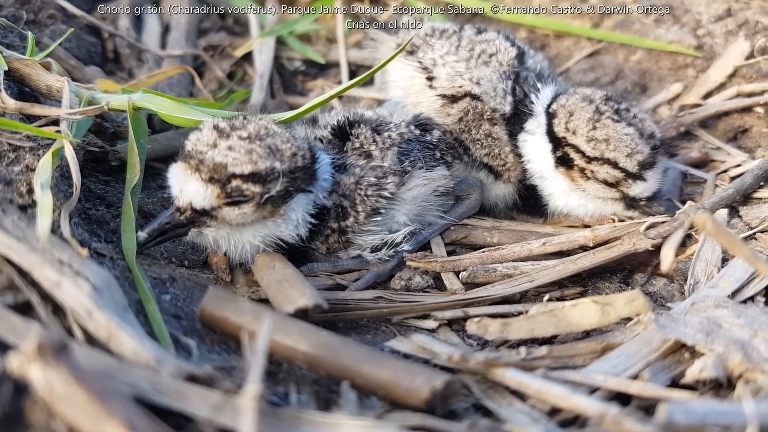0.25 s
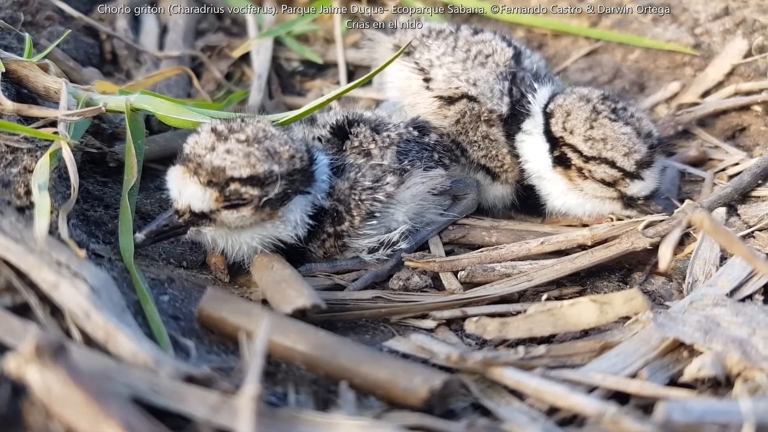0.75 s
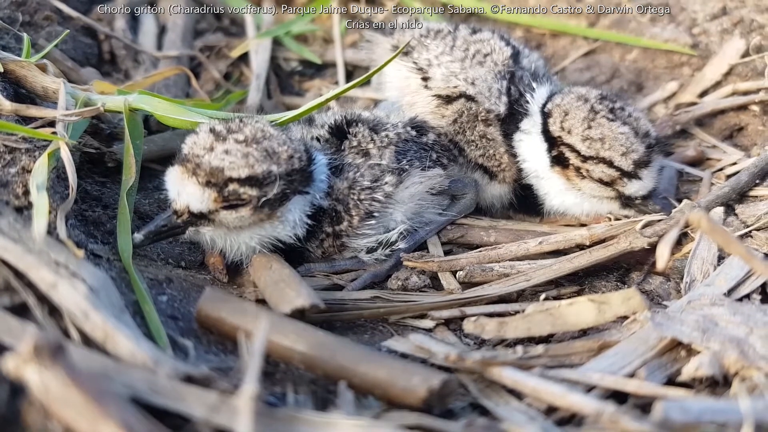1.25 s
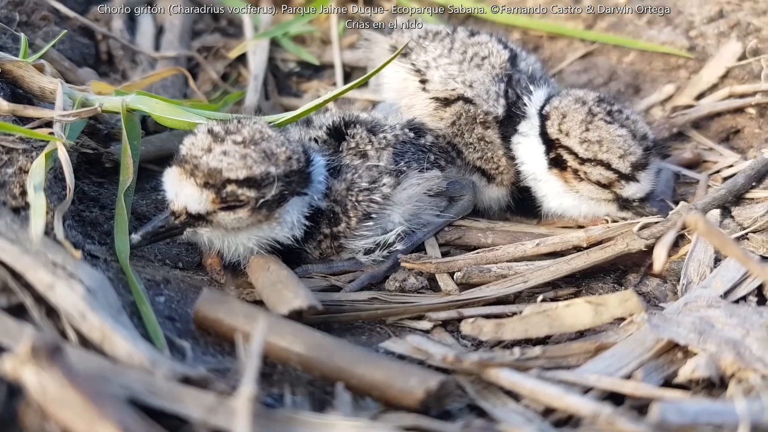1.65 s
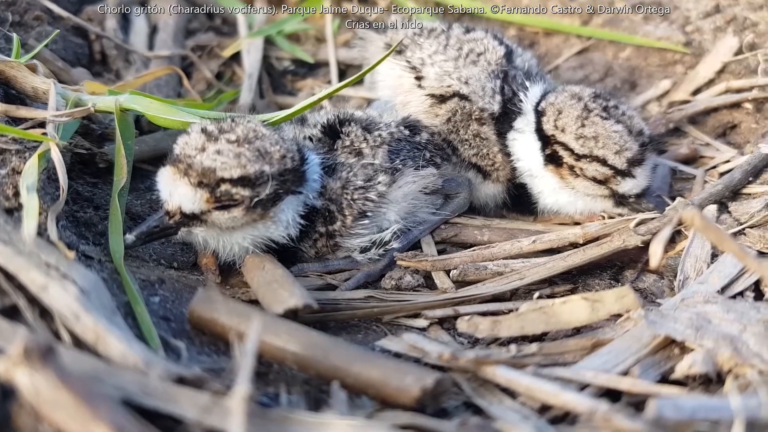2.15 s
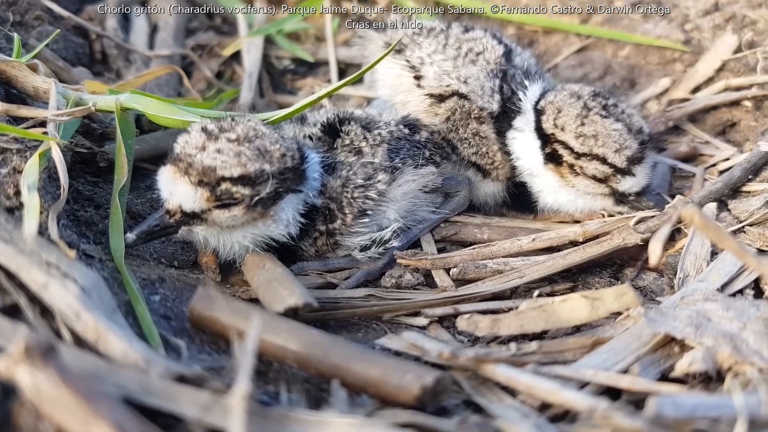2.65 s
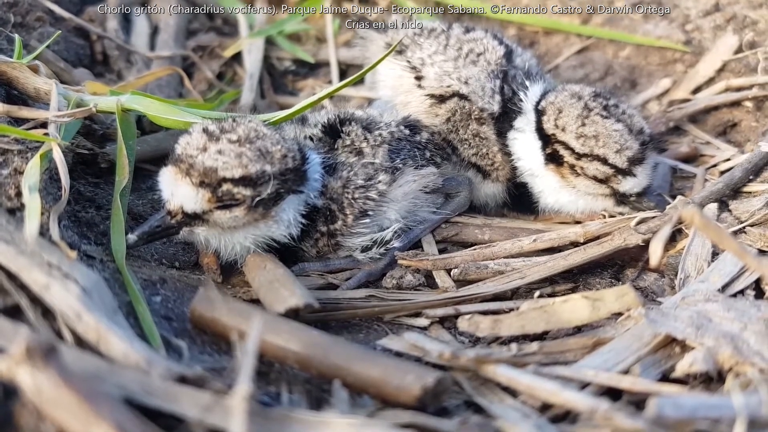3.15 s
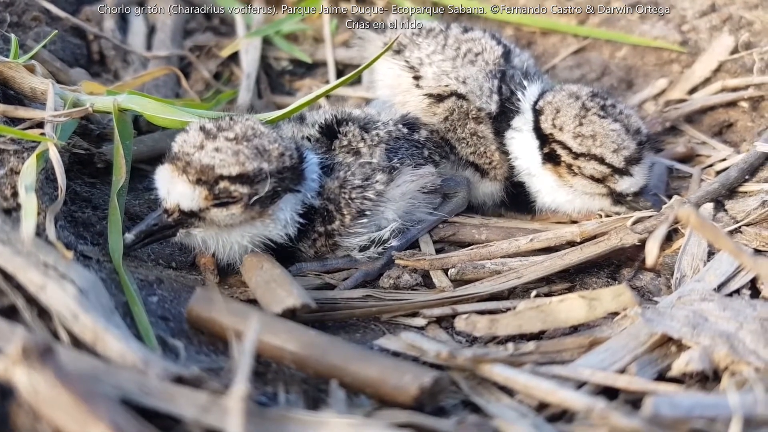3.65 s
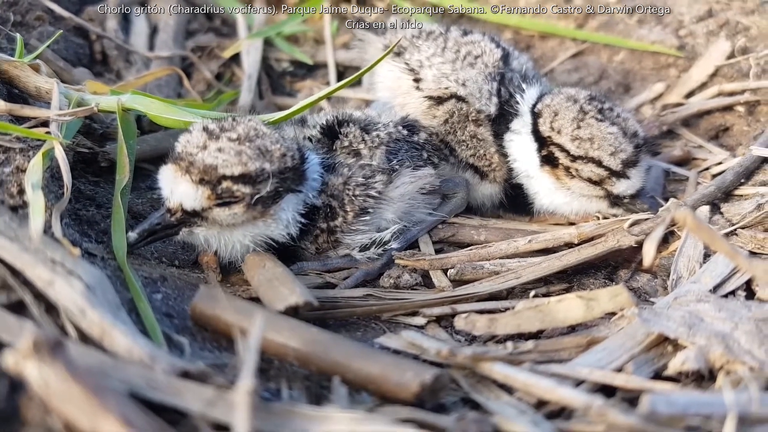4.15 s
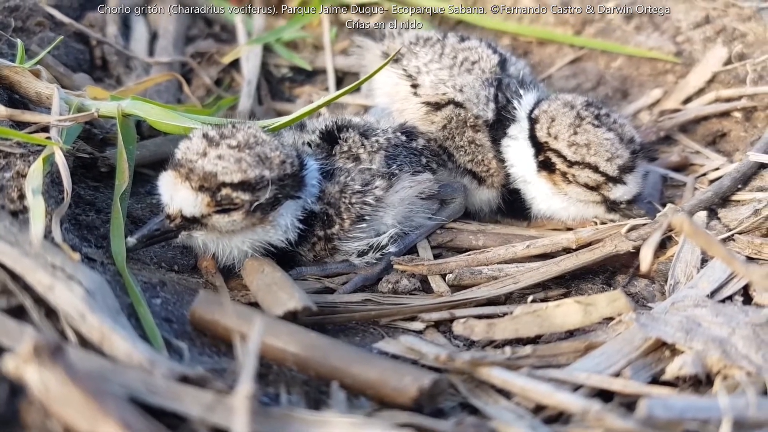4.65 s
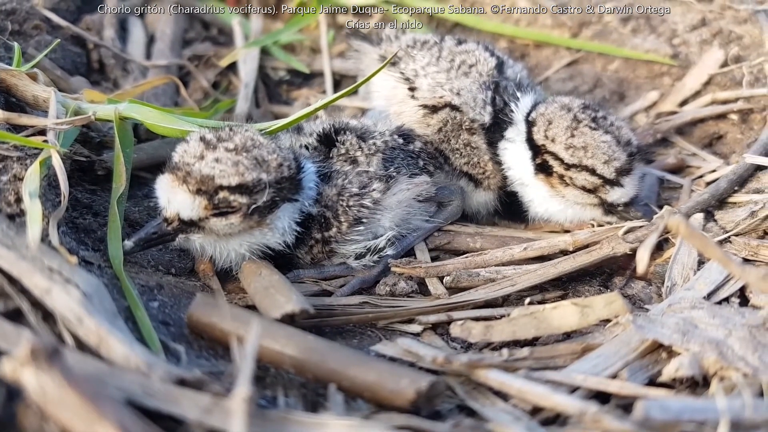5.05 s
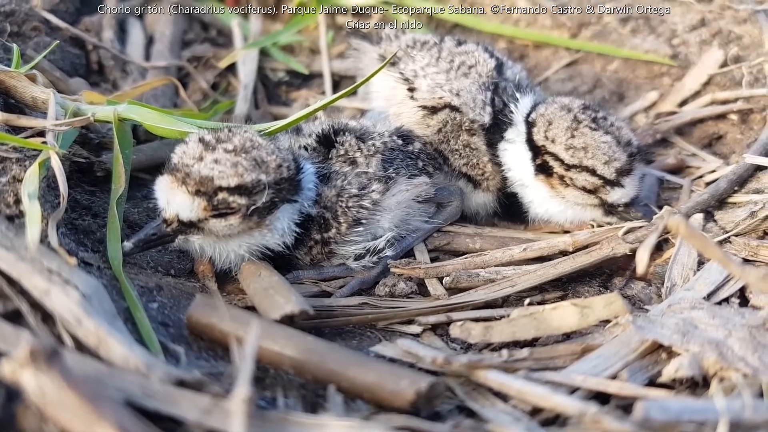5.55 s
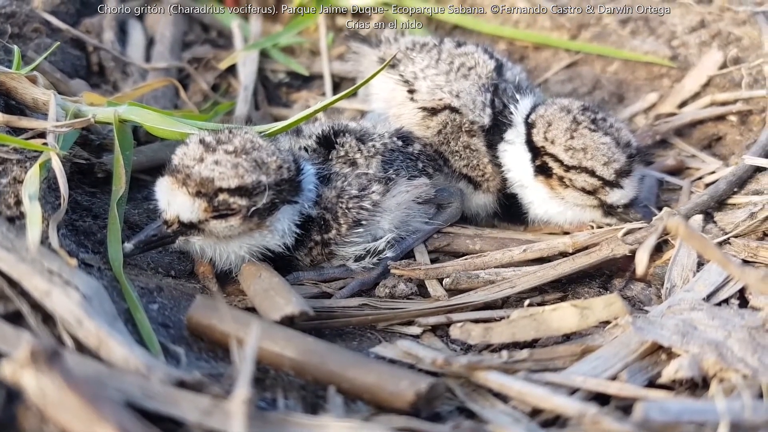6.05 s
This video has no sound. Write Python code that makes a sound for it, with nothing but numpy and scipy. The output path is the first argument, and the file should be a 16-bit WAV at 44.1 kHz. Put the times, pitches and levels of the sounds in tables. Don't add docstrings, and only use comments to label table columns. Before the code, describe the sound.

Right at the start a close plover chick gives a high, fluttering squeal breaking into rapid dry ticks, then a quick falling chirp. Low wind rumble and soft hiss continue while distant birds whistle faintly. Past the middle, a rising chip leads into a loud, clear, piercing peep with a stem rustle. Faint nasal yips repeat to the end with thin rising whistles. Open ground, stereo microphone near the chick, who sits left.

```python
import sys
import numpy as np
from scipy import signal
from scipy.fft import rfft, irfft
from scipy.io import wavfile
from scipy.ndimage import uniform_filter1d

SR = 44100
rng = np.random.default_rng(int(sys.argv[2]) if len(sys.argv) > 2 else 0)


def volts(x):
    e = np.asarray(x, float) / 20
    return 10 ** e


def dump(signal):
    limited = np.clip(np.atleast_2d(signal).T, -1, 1)
    pcm = np.round(limited * 32767).astype(np.int16)
    wavfile.write(sys.argv[1], SR, pcm)


N = 278271

# time_s, pitch_hz, level_db, flutter_depth (0-1)
SQUEAL = [(.02, 4590, -36, .4), (.027, 4560, -22.5, .3), (.05, 4470, -23, .22), (.058, 4400, -30, .6),
          (.09, 4170, -44, .4), (.155, 4080, -51, .4), (.161, 4090, -37, .12), (.208, 4200, -37.5, .15),
          (.218, 4220, -47, .3)]
# time_s, pitch_hz, level_db, flutter_depth (0-1)
FALLING_NOTE = [(.28, 4540, -50, .2), (.286, 4490, -33, .06), (.292, 4420, -33, .05),
                (.297, 4330, -46, .05), (.303, 4100, -33, .05), (.313, 3830, -29, .04),
                (.322, 3580, -31.5, .03), (.329, 3400, -43, .03)]
# time_s, pitch_hz, level_db, flutter_depth (0-1)
CHIP = [(3.655, 3072, -42, .04), (3.665, 3749, -29.5, .03), (3.671, 3990, -31, .03), (3.676, 4190, -40, .1)]
# time_s, pitch_hz, level_db, flutter_depth (0-1)
PEEP = [(3.678, 4150, -37, .1), (3.697, 4560, -24, .012), (3.72, 4735, -22, .02), (3.749, 4675, -20, .04),
        (3.762, 4545, -21, .012), (3.792, 4525, -25, .02), (3.845, 4650, -22, .008),
        (3.895, 4660, -27, .006), (3.965, 4905, -32.5, .006)]
# release_s, fade_db, pitch_change_hz
RELEASES = [
    (.007, -18, -150),
    (.026, -26, 30),
]
# first_s, last_s, rise_hz
REGISTER_JUMP = (3.792, 3.819, 125)
# time_s, added_flutter (0-1)
CATCHES = [(3.731, .15), (3.806, .05), (3.848, .012)]
# multiple, level_db
PEEP_OVERTONES = [(2, -25.5)]
# frequency_hz, gain_db
BEAK = [(1500, -20), (2600, -9), (3400, 0), (5800, 0), (7000, -3), (12000, -3)]
# time_s, peak_db
SNAPS = [(.0039, -25), (.0124, -24), (.0172, -22), (.0235, -24), (.0595, -25), (.064, -25), (.0681, -24),
         (.0705, -27), (.0729, -25), (.0757, -26), (.0799, -27), (.0835, -28), (.0877, -24.5), (.0935, -26),
         (.0999, -29), (.1038, -28), (.1111, -28), (.1226, -26), (.1407, -28.5), (.1485, -25.5),
         (.1624, -27), (.1761, -27), (.1913, -28), (.1964, -28), (.213, -25), (.2252, -27), (.2328, -26),
         (.2352, -26), (.2592, -26), (.2643, -26)]
# time_s, pitch_hz
SNAP_PITCH = [(0, 4680), (.07, 4600), (.11, 4250), (.2, 4170), (.21, 4600), (.27, 4600)]
# first_s, last_s, level_db, spread_db, rate_per_s
FAINT_SNAPS = (.088, .28, -39, 3, 180)

# start_s, length_s, top_pitch_hz, level_db, sag_lateness (exponent)
YIPS = [(3.28, .078, 805, -56, 1.6), (4.07, .095, 845, -47, 1.0), (4.551, .085, 840, -43.5, 1.1),
        (4.905, .1, 900, -40, 1.2), (5.228, .1, 928, -38.5, 1.6), (5.533, .03, 900, -44, 1.2),
        (5.56, .072, 900, -43.5, 1.6), (5.823, .1, 930, -39.5, 2.2), (6.1, .1, 930, -39.5, 2.6)]
# frequency_hz, gain_db
YIP_THROAT = [(900, -45), (1500, -16), (1850, -3), (2500, 9), (3700, 6.5), (4600, -3.5), (5500, -4.5),
              (7000, -16.5), (8300, -25), (10200, -32.5), (12000, -53)]
# frequency_hz, gain_db
BREATH = [(1500, -48), (3000, -36.5), (5500, 2), (7000, -13.5), (8500, -3), (11500, -12.5), (16000, -26.5)]

# start_s, pitch_hz, level_db
PIPS = [
    (1.878, 1990, -55),
    (4.428, 2010, -54),
]
# start_s, length_s, top_hz, bend (exponent), end_level_db
RISES = [
    (1.972, .36, 1985, 1.0, -53),
    (4.485, .455, 1960, 1.8, -50),
    (5.575, .182, 1918, 3.5, -45.5),
]
# start_s, length_s, first_hz, last_hz, level_db
FLICKS = [
    (5.522, .032, 2030, 2080, -51),
    (5.757, .03, 1975, 1995, -50),
]
# multiple, level_db
BRIGHT_PARTIALS = [(1, -6), (2, 0), (3, -24), (4, -25), (5, -16), (6, -24)]
# multiple, level_db
WHISTLE_PARTIALS = [(1, -10), (2, 0), (3, -29), (4, -34), (5, -36)]
# start_s, length_s, first_hz, last_hz, level_db
SLIDES = [(2.15, .05, 4150, 4120, -66), (2.197, .05, 4130, 3200, -56), (2.245, .05, 3250, 2750, -64),
          (2.76, .49, 4530, 2300, -59.5), (1.275, .03, 3250, 3100, -67), (5.352, .075, 4150, 3500, -66),
          (5.44, .055, 3350, 3050, -65), (3.433, .02, 3200, 3150, -63), (3.527, .022, 3200, 3150, -60),
          (3.62, .02, 3200, 3050, -62), (3.72, .02, 3100, 3270, -39.5), (3.74, .022, 3150, 3050, -39),
          (5.546, .04, 3290, 3280, -41)]
# first_s, last_s, level_db, centre_hz, swing_hz, swings_per_s, top_s
WARBLE = (.85, 1.03, -72.5, 6230, 480, 21.5, .948)
PLACES = {"chick": [(6, -15.5), (7, -16)], "parent": (-1.4, 1), "far": (-1.1, 0.87), "yip": (-3.9, 3.73)}

# start_s, length_s
RUSTLE_TIMES = [(3.84, .4), (.015, .085), (3.69, .13)]
# level_db, centre_hz, width_hz
RUSTLES = [
    (-47.5, 1220, 2350),
    (-39.5, 5100, 3800),
    (-46, 4900, 3900),
]
# time_s, peak_db
TICKS = [(0.5533, -54.5)]

# frequency_hz, density_db (per Hz)
AIR = [(20, -10.5), (53, 0), (155, 0), (180, -12.5), (280, -6), (700, -16), (1700, -28), (2400, -34.5),
       (2900, -41), (4300, -39.5), (6000, -49.5), (6800, -54.5), (9300, -52), (11500, -53.5)]
# time_s, level_db
AIR_SWELL = [(0.0, -48.5), (4.5, -47.5), (6.31, -47.5)]
# frequency_hz, likeness (0-1)
SAME = [(30, .5), (100, .52), (170, .94), (350, .95), (560, .68), (1000, .5), (1500, .15), (9000, .02)]
# frequency_hz, left_minus_right_db
AIR_BALANCE = [(60, -1.5), (170, 1.5), (400, 0.5), (860, 4.5), (1400, 1), (2500, -3.5), (3300, -5),
               (4800, -1), (6100, -12), (7200, 3.5), (10500, 1)]
# frequency_hz, over_usual_level_db
MASK = [(5200, -8), (6200, -4), (6600, 1.5), (7300, 1), (8500, 0), (9200, -1.5), (11000, -1.5), (11600, -1)]

LOW_HZ = 1755


def read(points, hz):
    f, value = np.transpose(points)
    return np.interp(np.log(hz + 1), np.log(f + 1), value)


def evened(x):
    return x / np.sqrt(np.mean(x ** 2) + 1e-20)


def add(mix, s, sound):
    part = mix[round(s * SR):][:len(sound)]
    part += sound[:len(part)]


def wander(size, smooth_s):
    width = int(smooth_s * SR) + 1
    once = uniform_filter1d(rng.standard_normal(size), width)
    return evened(uniform_filter1d(once, width))


def coloured(x, points):
    return irfft(rfft(x) * volts(read(points, np.fft.rfftfreq(len(x), 1 / SR))), len(x))


def banded(x, hz, width_hz):
    band = np.exp(-((np.fft.rfftfreq(len(x), 1 / SR) - hz) / width_hz) ** 2)
    return evened(irfft(rfft(x) * band, len(x)))


def unroll(rows):
    s, *columns = np.transpose(rows)
    t = np.arange(s[0], s[-1], 1 / SR)
    return t, [np.interp(t, s, c) for c in columns]


def shares(start, length):
    u = np.linspace(0, 1, num=40)
    return start + length * u, u


def arch(u, top, before, after, bend):
    rising = before * np.clip(1 - u / top, 0, 1) ** 2
    return rising + after * np.clip((u - top) / (1 - top), 0, 1) ** bend


def chick(tables, release_s, fade_db, change_hz):
    out, rows = np.zeros(N), np.concatenate(tables)
    ending = rows[-1] + [release_s, change_hz, 0, 0]
    t, (hz, db, depth) = unroll(np.vstack([rows, ending]))
    db = db + fade_db * np.clip((t - rows[-1, 0]) / release_s, 0, 1) ** 2
    jump_first, jump_last, jump_hz = REGISTER_JUMP
    hz = hz + jump_hz * uniform_filter1d(1. * (t > jump_first) * (t < jump_last), size=90)
    catch_s = .006
    depth = depth + sum(more * np.exp(-((t - s) / catch_s) ** 2) for s, more in CATCHES)
    flutter_hz, flutter_width_hz = 880, 760
    noises = rng.standard_normal((2, len(t)))
    level, phase = (depth * banded(v, flutter_hz, flutter_width_hz) for v in noises)
    turn = 2 * np.pi * np.cumsum(hz) / SR + 0.87 * phase
    tone = np.cos(turn) + sum(volts(over_db) * np.cos(k * turn) for k, over_db in PEEP_OVERTONES)
    voice = np.sqrt(2) * uniform_filter1d(volts(db), 60) * tone * (1.5 + level)
    add(out, t[0], voice * signal.windows.tukey(len(t), .02))
    return out


def snap(db, hz):
    width_ms, point = 1.0, 1.5
    ms = np.arange(-90, 90) * 1000 / SR
    turn = 2 * np.pi * hz * ms / 1000
    envelope = np.exp(-abs(ms / np.where(ms < 0, width_ms / 2, width_ms)) ** point)
    return volts(db + 6) * envelope * (np.cos(turn) + .05 * np.cos(2 * turn))


def snaps():
    out, (first, last, db, spread_db, rate) = np.zeros(N), FAINT_SNAPS
    grid = np.arange(first, last, 1 / rate)
    shift, size = rng.standard_normal((len(grid), 2)).T
    faint = list(zip(grid + .3 * shift / rate, db + spread_db * size))
    for s, peak_db in SNAPS + faint:
        hz = np.interp(s, *np.transpose(SNAP_PITCH)) * rng.normal(1, .025)
        add(out, s - 90 / SR, snap(peak_db, hz))
    return out


def yip(start, length, top_hz, db, late):
    s, u = shares(start, length)
    top = .27
    hz = top_hz * (1 - arch(u, top, .07, .26, late))
    voice_db = db + arch(u, top, -11, -19, 1.5)
    breath_db = db - 29 + arch(u, .55, -12, -12, 2.6)
    return np.transpose([s, hz, voice_db, breath_db])


def yips():
    out, orders = np.zeros(N), np.arange(1, 13)[:, None]
    for row in YIPS:
        t, (hz, db, breath_db) = unroll(yip(*row))
        gone = t - t[0]
        hoarse = .025 + .5 * np.exp(-gone / .01) + .22 * (gone / gone[-1]) ** 3
        turn = 2 * np.pi * np.cumsum(hz) / SR + hoarse * wander(len(t), 0.0011)
        closing_db = -80 * (1 - hz / hz.max()) * np.maximum(orders * hz - 3100, 0) / 1000
        throat_db = read(YIP_THROAT, orders * hz)
        unsteady_db = np.array([1.5 * wander(len(t), 0.0049) for _ in orders])
        gains = volts(throat_db + closing_db + unsteady_db)
        stack = (gains * np.cos(orders * turn)).sum(0) / np.sqrt((volts(throat_db) ** 2).sum(0))
        hiss = coloured(rng.standard_normal(len(t)), BREATH)
        breath = evened(hiss * volts(1.5 * wander(len(t), .006)))
        voice = volts(db + 5) * stack + volts(breath_db + 13) * breath
        add(out, t[0], voice * signal.windows.tukey(len(t), .15))
    return out


def pip(start, hz, db):
    hold_s, fall_s = .036, .017
    s, _ = shares(start, hold_s + 3 * fall_s)
    fall = np.clip((s - start - hold_s) / fall_s, 0, 3)
    scoop_hz = 50 * np.exp(-(s - start) / .006)
    return np.transpose([s, hz - scoop_hz + (LOW_HZ - hz) * np.tanh(fall), db - 7 * fall ** .7])


def rise(start, length, top_hz, bend, db):
    s, u = shares(start, length)
    left = (1 - u) ** bend
    return np.transpose([s, top_hz + (LOW_HZ - top_hz) * left, db - 9 * left])


def slide(start, length, first_hz, last_hz, db):
    s, u = shares(start, length)
    return np.transpose([s, first_hz * (last_hz / first_hz) ** u, db + arch(u, .3, -20, -19, .8)])


def whistles(tables, partials, shimmer=0.19):
    out = np.zeros(N)
    brightening = .5
    for rows in tables:
        t, (hz, db) = unroll(rows)
        turn = 2 * np.pi * np.cumsum(hz) / SR
        effort_db = brightening * (db - db.max())
        tone = sum(volts(part_db + max(k - 2, 0) * effort_db) * np.cos(k * turn)
                   for k, part_db in partials)
        trembling = 1 + shimmer * wander(len(t), 0.018)
        window = signal.windows.tukey(len(t), .08)
        add(out, t[0], np.sqrt(2) * volts(db) * tone * trembling * window)
    return out


def warble():
    out = np.zeros(N)
    first, last, db, hz, swing_hz, rate, top = WARBLE
    t = np.arange(first, last, 1 / SR)
    swing = np.cos(2 * np.pi * rate * (t - top))
    tone = np.cos(2 * np.pi * np.cumsum(hz + swing_hz * swing) / SR)
    add(out, first, volts(db + 2.0 * swing) * tone * signal.windows.tukey(len(t), .4))
    return out


def placed(x, balance_db, lag):
    hz = np.fft.rfftfreq(N, 1 / SR)
    late = irfft(rfft(x) * np.exp(-2j * np.pi * hz * lag / SR), N)
    return np.array([late * volts(balance_db / 2), x * volts(-balance_db / 2)])


def ground(x, t60=0.75):
    t = np.arange(int(.3 * SR)) / SR
    sparse = rng.standard_normal((2, len(t))) * (rng.random((2, len(t))) < .05)
    taps = sparse * volts(-60 * t / t60) * (t > .003)
    return signal.fftconvolve(x[None], taps / np.linalg.norm(taps[0]), axes=1)[:, :N]


def stems():
    out = np.zeros((2, N))
    for side in out:
        for (s, length), (db, hz, width_hz) in zip(RUSTLE_TIMES, RUSTLES):
            size = int(length * SR)
            grain = rng.standard_normal(size) * volts(3.0 * wander(size, 0.0043))
            rustle = banded(grain, hz, width_hz) * signal.windows.tukey(size, .5)
            add(side, s, volts(db) * rustle)
        for s, db in TICKS:
            click = uniform_filter1d(rng.standard_normal(90), size=3) * np.exp(-np.arange(90) / 20.)
            add(side, s, volts(db + 10.5) * click * 2.6)
    return out


def air():
    frames, hz = N // 256 + 5, np.fft.rfftfreq(1024, 1 / SR)
    a, b, c, d, patches = rng.standard_normal((frames, 513, 5)).T
    patches = evened(uniform_filter1d(uniform_filter1d(patches, 10, 0), 14, 1))
    s, swell_db = np.transpose(AIR_SWELL)
    swell_db = np.interp(np.arange(frames) * 256 / SR, s, swell_db - swell_db.mean())
    same, left = np.clip(read(SAME, hz), 0, 1)[:, None], a + 1j * b
    lag_s = 0.0004
    lead = np.exp(2j * np.pi * hz * lag_s)[:, None]
    z = np.array([left, same * lead * left + np.sqrt(1 - same ** 2) * (c + 1j * d)])
    z *= volts(read(AIR, hz)[:, None] + 1.0 * patches + swell_db)
    z *= volts(np.array([.5, -.5])[:, None] * read(AIR_BALANCE, hz))[:, :, None]
    return volts(-38.5) * evened(signal.istft(z, nperseg=1024, noverlap=768)[1][:, :N])


def scene():
    first = coloured(volts(.8) * chick([SQUEAL, FALLING_NOTE], *RELEASES[0]) + snaps(), BEAK)
    second = volts(-1.0) * chick([CHIP, PEEP], *RELEASES[1])
    near = placed(first, *PLACES["chick"][0]) + placed(second, *PLACES["chick"][1])

    nasal = yips()
    pips, rises = [pip(*row) for row in PIPS], [rise(*row) for row in RISES]
    flicks = [slide(*row) for row in FLICKS]
    parent = whistles(pips[:1] + rises[:1], BRIGHT_PARTIALS)
    parent += whistles(pips[1:] + rises[1:] + flicks, WHISTLE_PARTIALS)
    far = whistles([slide(*row) for row in SLIDES], [(1, 2), (2, -35)], shimmer=.3) + warble()
    others = placed(parent, *PLACES["parent"]) + placed(far, *PLACES["far"])
    others += placed(nasal, *PLACES["yip"])

    echoes = volts(-38) * ground(first + second, t60=.15)
    echoes += volts(-12) * ground(parent + far, t60=.3)
    echoes += volts(-5) * ground(nasal, t60=.035)
    return near + others + echoes + stems() + air()


def thinned_treble(x):
    masked_db, image_db, image_hz, top_hz = -52, -35, 9600, 11700
    hz, _, z = signal.stft(x, SR, nperseg=2048, noverlap=1024)
    bands = abs(z[:, :1024].reshape(2, 128, 8, -1)) ** 2
    power_db = 10 * np.log10(bands.sum((0, 2)) + 1e-20)
    centre = hz[:1024].reshape(128, 8).mean(1)
    shadow_db = power_db[centre > 2000].max(0) + masked_db
    usual_db = np.median(power_db, axis=1) + read(MASK, centre)
    heard = power_db > np.maximum(shadow_db, usual_db[:, None])
    keep = heard | (centre[:, None] < 5200)
    z[:, :1024] *= np.repeat(keep, 8, axis=0)
    kept = rfft(signal.istft(z, SR, nperseg=2048, noverlap=1024)[1][:, :N])
    f = np.fft.rfftfreq(N, 1 / SR)
    middle = kept * (f > 2600) * (f < 6200)
    image = np.roll(middle, round(image_hz * N / SR), axis=1)
    return irfft(kept * (f < top_hz) + volts(image_db) * image, N)


def roll_off(x):
    return signal.sosfilt(signal.butter(12, 16210, fs=SR, output="sos"), x)


def record(dry):
    mix = thinned_treble(dry)
    return roll_off(mix)


dry = scene()
out = record(dry)
dump(out)
```